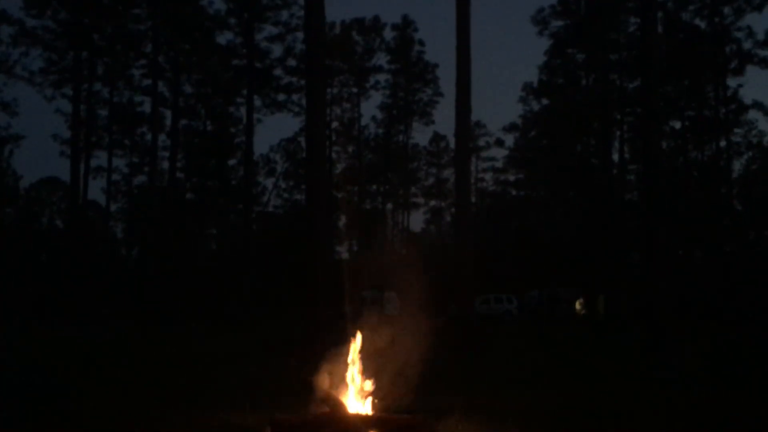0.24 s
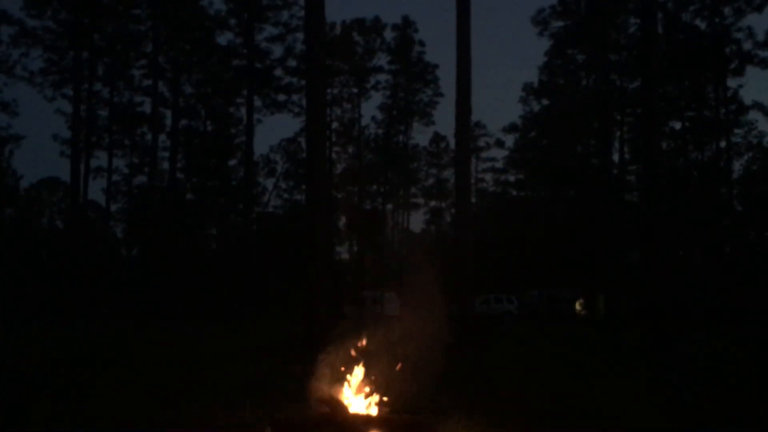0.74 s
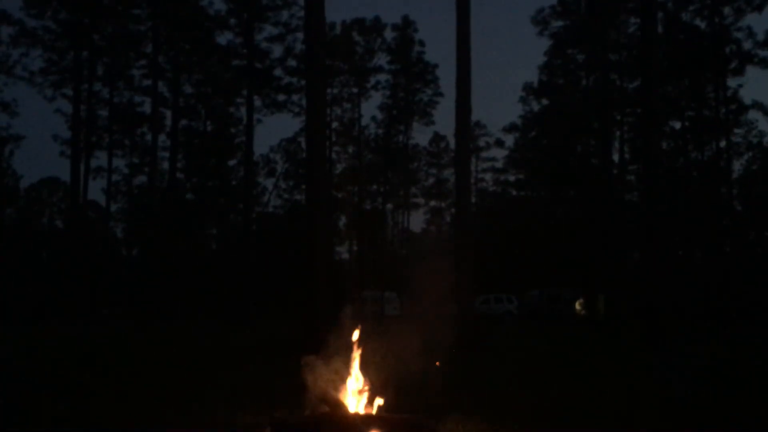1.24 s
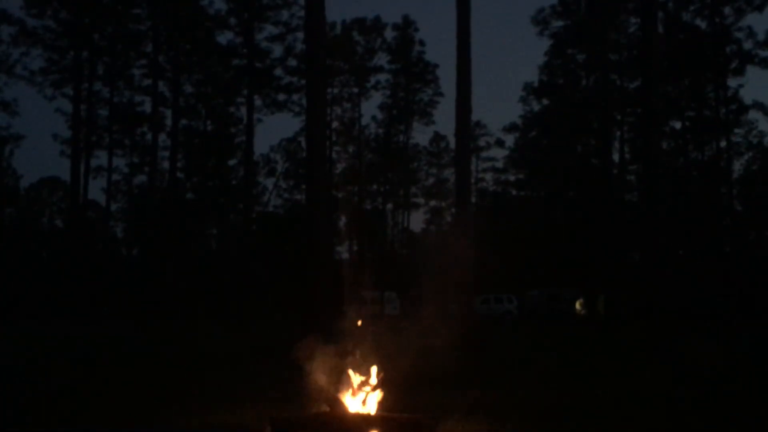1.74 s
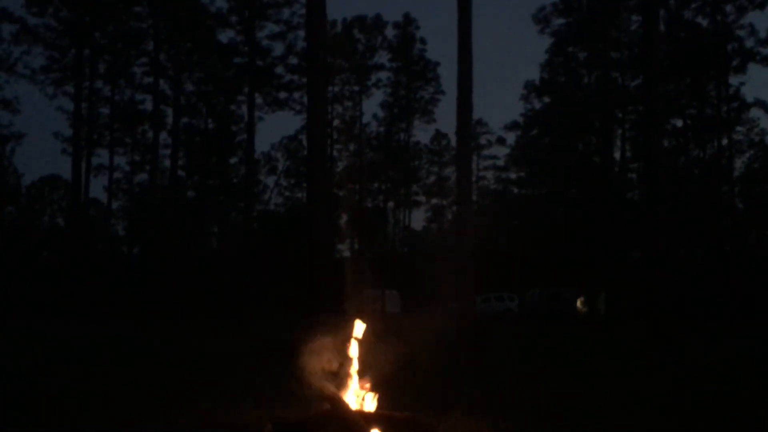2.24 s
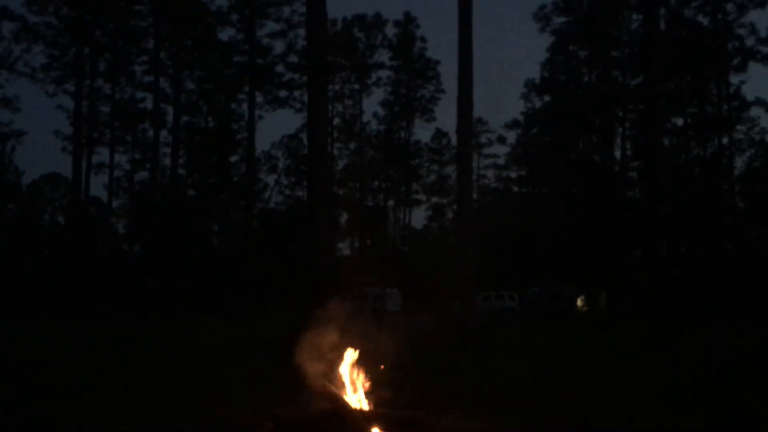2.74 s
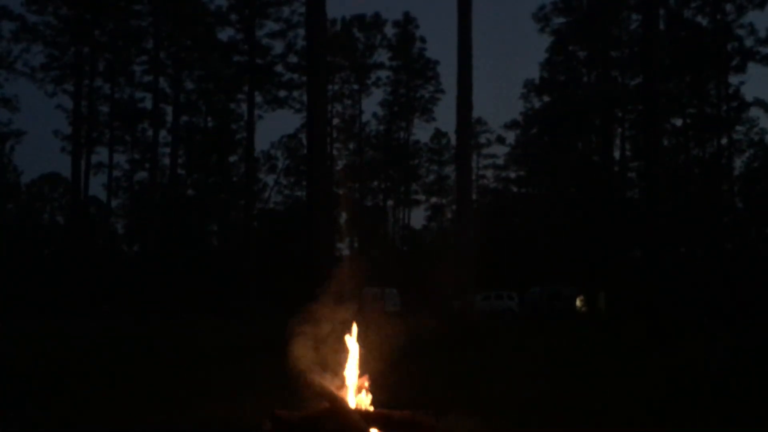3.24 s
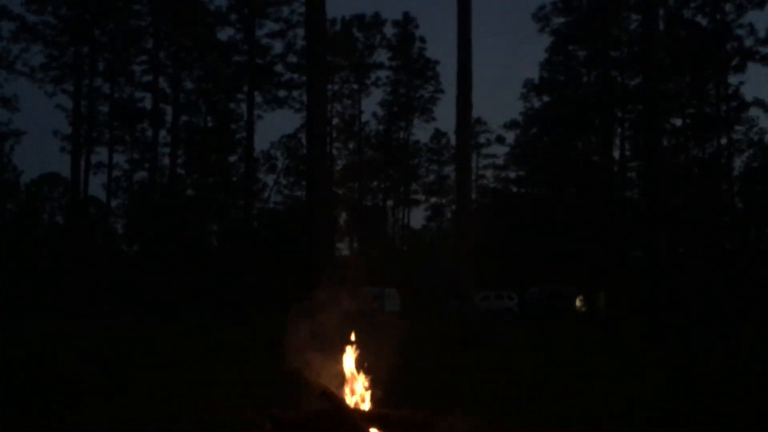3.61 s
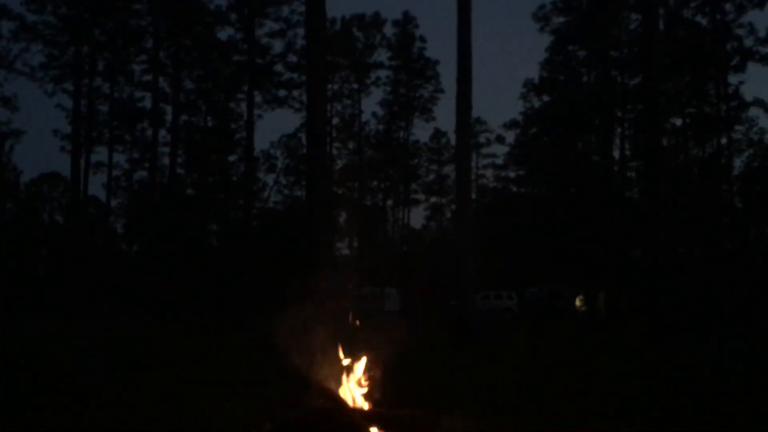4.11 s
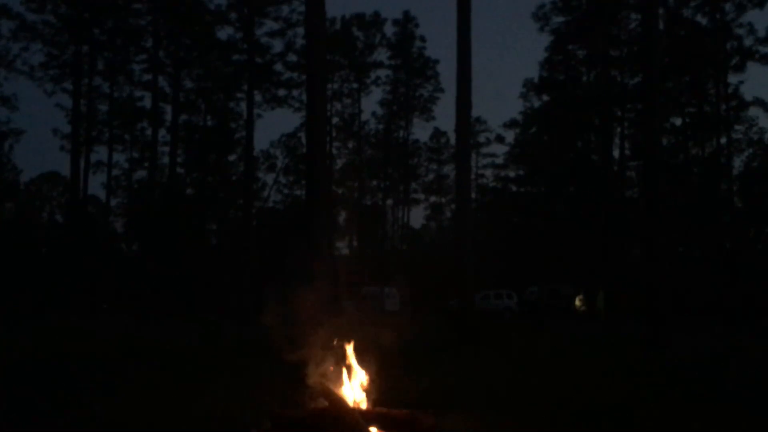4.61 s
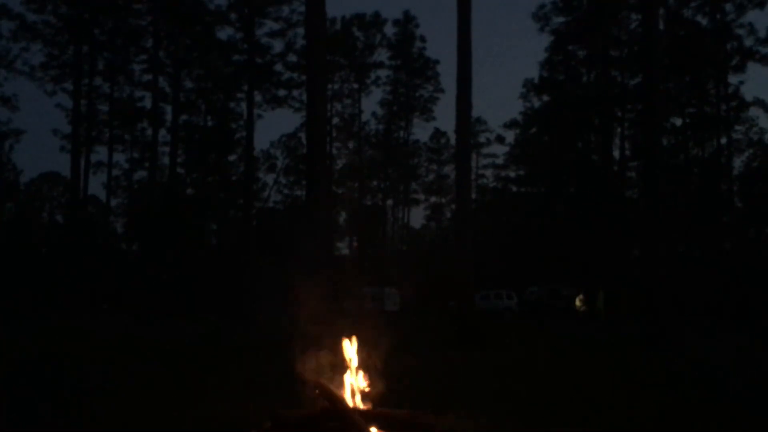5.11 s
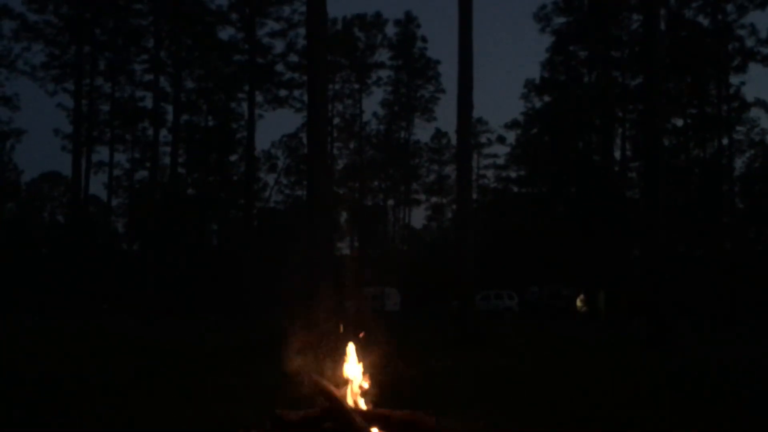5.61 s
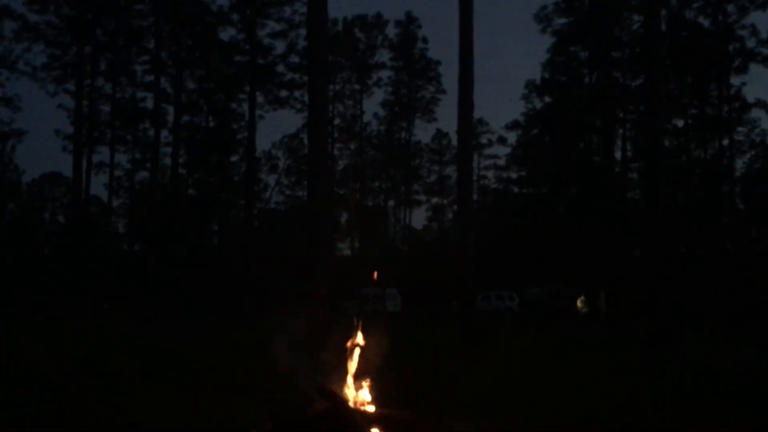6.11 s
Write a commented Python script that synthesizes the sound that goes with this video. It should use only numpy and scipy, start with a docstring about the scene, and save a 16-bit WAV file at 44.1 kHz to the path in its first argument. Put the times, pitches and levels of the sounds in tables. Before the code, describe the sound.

Night insects hold a steady, silvery, slightly beating trill throughout, with small crickets pulsing quickly above it early on and katydids buzzing very high and fading. In front, a campfire cracks at uneven intervals, clustered at first, each pop an instant snap with a few milliseconds of splintering. Quiet rumble and hum sit far away, with one soft distant knock around four seconds. Outdoor woodland, a single fixed microphone near the fire, short tree echoes.

```python
"""Campfire and crickets at dusk

Close to the microphone a small campfire in a pine clearing pops: sharp pulses with splintering noise.
A cricket chorus near 3 kHz is built from wing strokes; smaller crickets above it are wavering sines
and a noise crowd, and katydids buzz in the treble as noise pulsed by wing cycles.
Far off lie rumble, machine hum and soft hiss, all shaped noise and sines; one cluster of damped
sines thuds in the distance. Sparse dying echoes place the insects, fire and thuds among the trunks."""
import sys
import numpy as np
from scipy import signal
from scipy.fft import rfft, irfft
from scipy.io import wavfile
from scipy.ndimage import map_coordinates

SR = 44100
rng = np.random.default_rng(int(sys.argv[2]) if len(sys.argv) > 2 else 0)


def file_out(sig):
    """Save sig as 16-bit WAV at sys.argv[1]."""
    # one column per channel
    cols = np.atleast_2d(sig).T
    # limit, then scale
    lim = np.clip(cols, -1, 1)
    pcm = np.round(lim * 32767).astype(np.int16)
    wavfile.write(sys.argv[1], SR, pcm)


N = 280476
TIME = np.arange(N) / SR
FREQS = np.fft.rfftfreq(N, 1 / SR)

# loud bursts in the burning wood, before the pit colour: (time [s], body at 2.2 kHz [dB],
# snap at 7 kHz [dB re body], tick at 14 kHz [dB re body])
LOUD_POPS = [(0.2003, -11.5, 0, -12), (0.339, -17, -9, -14), (0.42, -10.5, -12, -20), (0.465, -9.5, -6, -9),
             (0.489, -13.5, -2, 0), (0.5235, -9.5, -3, -5), (0.675, -19, 0, -3), (1.1405, -25, 6, 7),
             (1.256, -11, -9, -13), (1.3408, -15.5, -6, -8), (1.4879, -9, -9, -8.5), (2.037, -14, -0.5, -1),
             (2.18, -9.5, -13, -24), (2.6238, -9, -13, -10.5), (2.7593, -7, 0, -9), (2.94, -13, -8, -12),
             (3.185, -26, 8, 2), (3.192, -13, -6, -19), (3.4405, -17, -3.5, -1), (3.586, -18, -4, -3),
             (3.856, -13, -2, -14), (3.8771, -5, 0.5, -12), (3.9699, -20, 7, -3), (4.0074, -13, -6, 3),
             (4.441, -16.5, -8, -13), (4.6606, -13.5, -1, -17), (4.988, -11, -9, -13),
             (5.0366, -14.5, -6, -3), (5.284, -10.5, -4, 2), (5.4574, -23, 3, 5), (5.4828, -8, 0, -14),
             (5.7685, -11, -11, -26), (6.1193, -6.5, -10, -25), (6.2923, -5.5, -25, -31),
             (6.3337, -20, -8, 0)]
# colour that the logs and the ground give every burst: (frequency [Hz], gain [dB])
PIT_COLOUR = [(1300, -5), (2100, 0.5), (3400, -2), (4400, 3.5), (5200, -1.5), (5800, 1), (6650, -0.5),
              (7400, 0), (8400, -2), (9600, 3), (10400, -1), (11400, 2), (16000, -4)]
# nearest crickets of the chorus: (pitch [Hz], wing strokes [1/s], level among themselves [dB])
NEAR_CRICKETS = [(3092, 66.6, 0), (3055, 68.3, -3.5), (3085, 72, -4)]
# chorus with its echoes: (time [s], level [dB])
CHORUS_LEVEL = [(0.0, -46), (0.39, -44), (2.32, -42), (2.97, -39.5), (3.06, -43), (4.53, -40.5),
                (5.12, -43.5), (6.36, -41)]
# small crickets holding one note, before the echoes and trim:
# (start [s], end [s], pitch [Hz], level [dB], pitch scatter [share of pitch])
HELD_TRILLS = [(.55, .7, 5270, -48, .028), (0, 3.2, 4620, -56, .02), (3.1, 6.4, 4035, -57, .009),
               (3.8, 6.1, 4510, -58.5, .007)]
# small crickets chirping at an even pace, before the echoes and trim:
# (start [s], end [s], chirp period [s], pitch [Hz], level at the start [dB], level change [dB/s])
CHIRP_BOUTS = [(.13, .28, .15, 4445, -42.5, 0), (.5, 2.58, .208, 4462, -43, -3),
               (5.42, 6.6, .24, 3895, -49.5, 0)]
# spectral shape of the far small crickets: (frequency [Hz], relative density [dB per Hz])
CROWD_SPECTRUM = [(2900, -48), (3300, -4), (3450, -7), (3650, -3), (3930, 3), (4250, 0.5), (4620, 2.5),
                  (4800, -4), (5020, -10), (5300, -10), (5950, -15), (6150, -13.5), (7200, -29.5),
                  (9000, -45)]
# katydids, before their common fade: (wing cycles [1/s], centre [Hz], nominal width [Hz],
# level at the start [dB], level at the end [dB], share of the rasp repeating each cycle [0-1])
KATYDID_SINGERS = [(154.8, 12550, 760, -8, 1, 0.71), (166.2, 11770, 1460, -3.5, -2.5, 0.23),
                   (159, 12900, 1500, 0.5, -31, .1), (171.3, 8640, 1200, -3.5, -4.5, .15),
                   (177.3, 9600, 600, -5.5, -16, .1)]
# dull far thuds, before the echoes: (time [s], peak of the envelope [dB], pitch [Hz])
FAR_THUDS = [(4.114, -30.5, 560), (4.126, -31, 328), (4.186, -42, 640), (4.213, -48, 680),
             (4.262, -45, 620)]
# spectral shape of the distant rumble: (frequency [Hz], relative density [dB per Hz])
RUMBLE_SPECTRUM = [(15, -22), (31, -20), (43, -1), (58, 8), (85, 0), (130, -0.5), (240, 0), (320, -3),
                   (400, -8.5), (460, -14), (620, -19), (760, -26.5), (1100, -30.5), (3000, -45)]
# brief booms in the deepest rumble: (time [s], rise above the usual level [dB])
DEEP_BOOMS = [(4.255, 11.5), (6.08, 9), (6.31, 6.5)]
# one slow swell of the upper rumble: (time at the top [s], half length [s], rise [dB])
RUMBLE_SWELL = (4.73, .7, 1.75)
# machine hum, before its wavering: (frequency [Hz], level [dB])
HUM_TONES = [(56.5, -58), (59.5, -54), (120, -60.5), (140, -57), (164, -54.5), (327.5, -56.5), (397, -55),
             (476, -80), (595, -66.5), (675, -82.5), (712, -77.5)]
# spectral shape of the night air: (frequency [Hz], relative density [dB per Hz])
AIR_SPECTRUM = [(100, 0), (800, -3), (1300, -0.5), (2200, 1.5), (5000, 0), (7500, 3), (9000, 6.5),
                (10400, -7), (12000, 6), (14500, -1.5), (16000, -7)]

# faint crackles: weakest body, rise of the strongest above it, scatter in time round a loud pop
CRACKLE_DB, CRACKLE_RANGE_DB, FLURRY_S = -28.5, 10.5, .035
# a chirping cricket tires: its note sags, and the dips between chirps open up
SAG_HZ_PER_S, CHIRP_DIP_DB, DIP_OPENS_S = 30, -14, .7
# the crowd and the katydids die down steadily from these levels
CROWD_DB, CROWD_DB_PER_S = -43.5, -0.74
KATYDID_DB, KATYDID_DB_PER_S = -52, -1.1
RUMBLE_DB, DEEP_DB, DEEP_EDGE_HZ, BOOM_S = -43.8, -47.5, 88, 0.043
EDGE_HZ = 15780  # upper edge of the recorder's band


def fire(count=120):
    """Loud pops, tiny crackles crowding round them and at random; the ground and the trees echo them."""
    out = np.zeros(N)
    for s, *burst in LOUD_POPS:
        add(out, s, pop(*burst))
    flurries = np.array(LOUD_POPS)[:, 0] + FLURRY_S * rng.standard_normal(len(LOUD_POPS))
    scattered = rng.random(count) * N / SR
    for s in np.r_[flurries, scattered]:
        strength, snap, tick = rng.random(3)
        body_db = CRACKLE_DB + CRACKLE_RANGE_DB * strength ** 3  # mostly weak
        add(out, s, pop(body_db, -8 + 8 * snap, -11 + 10 * tick))
    near = forest(out, wet_db=-15.0, t60=0.15)
    far_echo = forest(out, wet_db=7, t60=0.52) - out
    return near + gain_of(-18.5) * far_echo


def pop(body_db, snap_db, tick_db, size=1024):
    """A gas pocket bursts: one sharp pulse, then a few ms of splintering."""
    hz, t = np.fft.rfftfreq(size, 1 / SR), np.arange(size) / SR
    colour = read([(2200, 0), (7000, snap_db), (14000, tick_db)], hz) + read(PIT_COLOUR, hz)
    # a tick stronger than the snap lets the burst reach lower
    corner_hz = np.interp(tick_db - snap_db, [0, 5], [1700, 800])
    low_cut = np.sqrt(1 + (corner_hz / (hz + 1)) ** 8)
    gain = gain_of(body_db + colour) / low_cut + 1e-5
    # minimum phase: the pulse starts at once, with nothing ahead of it
    log_gain = np.log(np.r_[gain, gain[-2:0:-1]])
    pulse = np.fft.ifft(np.exp(np.conj(signal.hilbert(log_gain)))).real
    splinters = rng.standard_normal(size) * np.exp(-t / 0.0018)
    splinters /= np.linalg.norm(splinters)
    return np.r_[pulse, np.zeros(size - 1)] + 0.46 * signal.fftconvolve(pulse, splinters)


def chorus(count=9):
    """A few near crickets, each swelling on its own, beat against many far ones."""
    near, far = np.zeros(N), np.zeros(N)
    for hz, strokes, db in NEAR_CRICKETS:
        song = cricket(hz, strokes, glide=.042, duty=.7, unsteady=0.003984)
        near += gain_of(db + 1.0 * drift(7.2)) * song
    for hz in np.linspace(2810, 3150, count):
        song = cricket(hz, rng.uniform(55, 80), glide=.045, duty=.85)
        far += gain_of(-abs(hz - 3060) / 19) * song  # strongest near 3060 Hz
    near = forest(evened(near), wet_db=-5.5, t60=0.33)
    far = forest(evened(far), wet_db=-0.5, t60=1.0)
    return gain_of(curve(CHORUS_LEVEL)) * evened(near + gain_of(-4.0) * far)


def cricket(hz, strokes, glide=.06, duty=.6, unsteady=0.005904):
    """Each wing closing rings the wing for a few ms, falling in pitch as it slows; no two are alike."""
    turns = np.cumsum(strokes * (1 + .015 * drift(4))) / SR + rng.random()
    along = np.minimum(turns % 1 / duty, 1)  # progress of the closing, then a rest
    stroke = turns.astype(int)
    force, detune, phase = rng.standard_normal((1000, 3))[stroke].T
    pitch = hz * (1 + glide * (.5 - along) + unsteady * detune)
    ring = np.sin(2 * np.pi * (np.cumsum(pitch) / SR + phase))
    return evened(gain_of(1.7 * force) * np.sin(np.pi * along) * ring)


def small_crickets():
    """Single chirps and trills, echoed by the trunks, stand in front of a fading crowd."""
    singles = chirper()
    for start, end, hz, db, scatter in HELD_TRILLS:
        singles += gain_of(db) * gate(start, end) * trill(hz, scatter)
    singles = forest(singles, wet_db=-11.5, t60=0.62)
    return gain_of(-3.5) * singles + gain_of(CROWD_DB + CROWD_DB_PER_S * TIME) * cricket_crowd()


def chirper():
    """Small crickets swell once in every chirp; a bout starts as a slur and its dips deepen."""
    out = np.zeros(N)
    for start, end, period, hz, db, db_per_s in CHIRP_BOUTS:
        age = np.clip(TIME - start, 0, end - start)
        dip = np.cos(np.pi * age / period) ** 4 * np.minimum(age / DIP_OPENS_S, 1)
        note = trill(hz - SAG_HZ_PER_S * age, scatter=.002)
        out += gain_of(db + db_per_s * age + CHIRP_DIP_DB * dip) * gate(start, end) * note
    return out


def trill(hz, scatter):
    """A small cricket's nearly pure note, rough from its strokes and slowly swelling."""
    pitch = hz * (1 + 0.00203 * drift(10.5) + scatter * drift(600))
    force = gain_of(0.82 * drift(9)) * (1 + 0.2 * drift(65))
    return evened(force * tone(pitch))


def cricket_crowd(count=45):
    """Far singers, their notes blurred by distance, are narrow noise lines over an even bed."""
    notes = np.linspace(3350, 7000, count) + 22 * rng.standard_normal(count)
    lines = sum(rng.uniform(.3, 1) / (1 + ((FREQS - hz) / 9) ** 2) for hz in notes)
    return noise(gain_of(read(CROWD_SPECTRUM, FREQS)) * np.sqrt(0.21 + lines))


def katydids(size=280):
    """A file rasps twice in each wing cycle, its teeth ringing a broad wing resonance."""
    out = np.zeros(N)
    for rate, hz, width, first_db, last_db, repeats in KATYDID_SINGERS:
        turns = np.cumsum(rate * (1 + .001 * drift(3))) / SR
        # one noise pattern read afresh each cycle, mixed with noise that never repeats
        teeth = map_coordinates(rng.standard_normal(size), [turns % 1 * size], order=3, mode="grid-wrap")
        rasp = np.sqrt(repeats) * teeth + np.sqrt(1 - repeats) * rng.standard_normal(N)
        strokes = 1 + 1.1 * np.cos(4 * np.pi * turns) + .3 * np.cos(2 * np.pi * turns)
        strokes = np.maximum(strokes, 0)
        wing = 1 / (1 + ((FREQS - hz) / (0.72 * width)) ** 2) ** 1.8
        out += gain_of(np.linspace(first_db, last_db, N)) * shaped(rasp * strokes, wing)
    return out * gain_of(KATYDID_DB + KATYDID_DB_PER_S * TIME)


def thuds():
    """Heavily damped low knocks with a tail from the woods."""
    out, t = np.zeros(N), np.arange(SR // 10) / SR
    age = t / 0.0022  # the envelope peaks at 2.2 ms
    for s, db, hz in FAR_THUDS:
        add(out, s, gain_of(db) * age ** 2 * np.exp(2 - 2 * age) * np.sin(2 * np.pi * hz * t))
    return forest(out, wet_db=-7.5, t60=0.44)


def distant_rumble():
    """Low noise split by depth: the upper part swells once, the deepest part booms briefly."""
    colour = gain_of(read(RUMBLE_SPECTRUM, FREQS))
    deep = 1 / (1 + (FREQS / DEEP_EDGE_HZ) ** 8)  # share of the power
    top_s, half_s, rise_db = RUMBLE_SWELL
    upper = gain_of(RUMBLE_DB + rise_db * hump(top_s, half_s)) * noise(colour * np.sqrt(1 - deep))
    boom_db = sum(db * hump(s, BOOM_S) for s, db in DEEP_BOOMS)
    return upper + gain_of(DEEP_DB + boom_db) * noise(colour * np.sqrt(deep))


def machine_hum():
    """Steady tones of a far machine, each wavering on its own in level and pitch."""
    out = np.zeros(N)
    for hz, db in HUM_TONES:
        level = gain_of(db + 1.08 * drift(2.8))
        out += level * evened(tone(hz * (1 + 0.00268 * drift(2.09))))
    return out


def night_air():
    """A soft hiss of shaped noise, fading slightly."""
    return gain_of(np.linspace(-52, -54.5, N)) * noise(gain_of(read(AIR_SPECTRUM, FREQS)))


def forest(x, wet_db, t60):
    """Trunks scatter the sound back as sparse, dying echoes, about 2000 a second after 3 ms."""
    t = np.arange(SR) / SR
    taps = rng.standard_normal(SR) * (rng.random(SR) < 2000 / SR) * (t > .003)
    taps *= np.exp(-np.log(1000) * t / t60)  # 60 dB down after t60 seconds
    return x + gain_of(wet_db) * signal.fftconvolve(x, taps / np.linalg.norm(taps))[:N]


def gain_of(db):
    """Decibels to amplitude."""
    return 10 ** (np.asarray(db) / 20)


def evened(x):
    """Scaled to an rms of one."""
    return x / np.sqrt(np.mean(x ** 2) + 1e-20)


def read(points, hz):
    """A spectrum joined by straight lines over log frequency."""
    f, value = np.transpose(points)
    return np.interp(np.log(hz + 1), np.log(f + 1), value)


def curve(rows):
    """A control curve at every sample."""
    return np.interp(TIME, *np.transpose(rows))


def gate(start, end):
    """Open from start to end, with 30 ms edges."""
    return np.clip(np.minimum(TIME - start, end - TIME) / .03, 0, 1)


def hump(s, width):
    """A smooth rise and fall around time s."""
    return np.exp(-((TIME - s) / width) ** 2)


def add(mix, s, sound):
    """Mixes a sound in at time s."""
    part = mix[max(round(s * SR), 0):][:len(sound)]
    part += sound[:len(part)]


def tone(pitch):
    """A sine that follows a moving pitch in Hz, from a random phase."""
    return np.sin(2 * np.pi * (np.cumsum(pitch) / SR + rng.random()))


def shaped(x, gain):
    """Filters by a gain per frequency; rms one."""
    return evened(irfft(rfft(x) * gain, N))


def noise(gain):
    """Noise with the given gain per frequency; rms one."""
    return shaped(rng.standard_normal(N), gain)


def drift(rate):
    """Slow chance of rms one, up to about rate changes a second."""
    return noise(np.exp(-(FREQS / rate) ** 2) * (FREQS > 0))


def scene():
    """Everything, near and far, as it reaches one microphone."""
    insects = chorus() + small_crickets() + katydids()
    background = distant_rumble() + machine_hum() + night_air()
    return (fire() + insects + thuds() + background)[None]


def record(dry):
    """The recorder's band limit: a steep low-pass."""
    low_pass = signal.firwin(511, EDGE_HZ, window=("kaiser", 9), fs=SR)
    return signal.oaconvolve(dry, low_pass[None], "same")


dry = scene()
out = record(dry)
file_out(out)
```